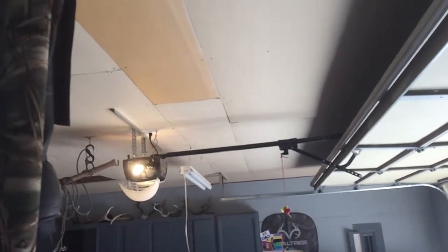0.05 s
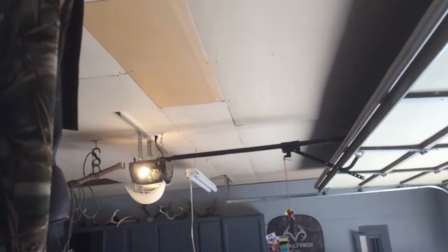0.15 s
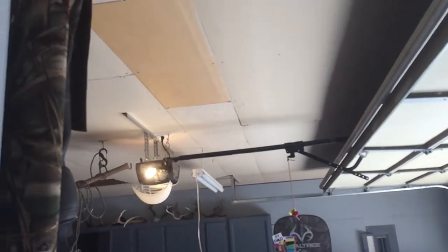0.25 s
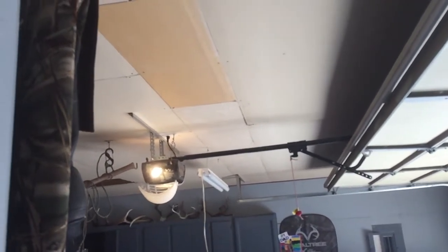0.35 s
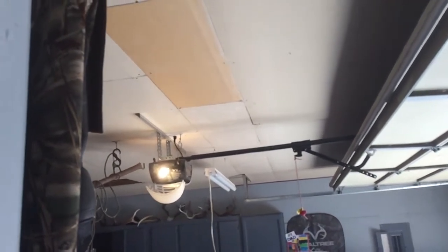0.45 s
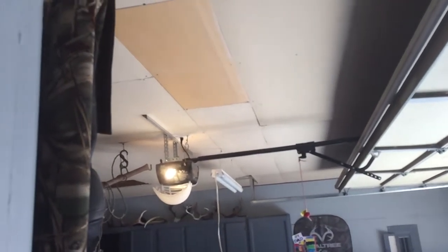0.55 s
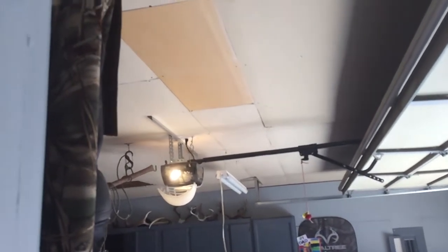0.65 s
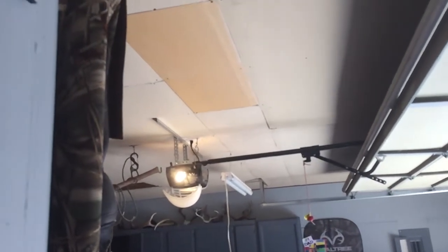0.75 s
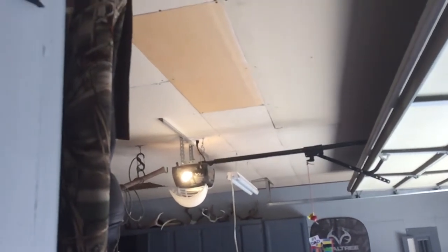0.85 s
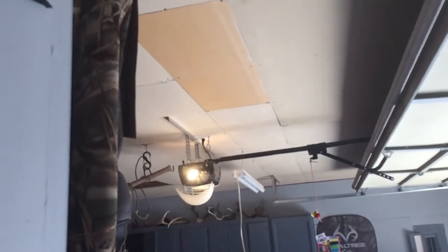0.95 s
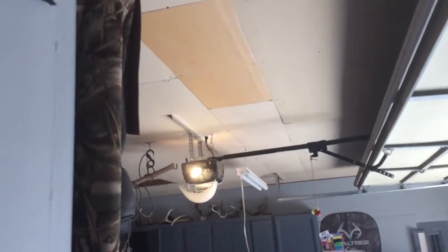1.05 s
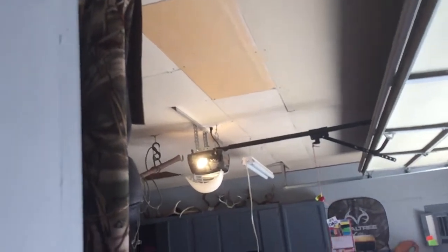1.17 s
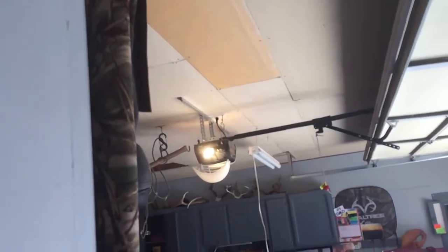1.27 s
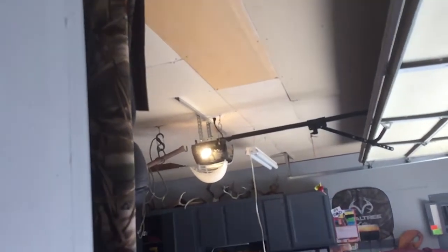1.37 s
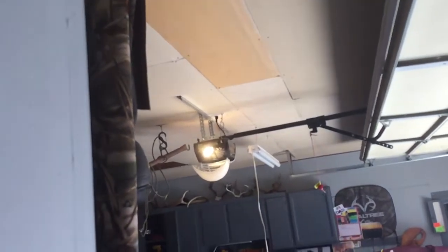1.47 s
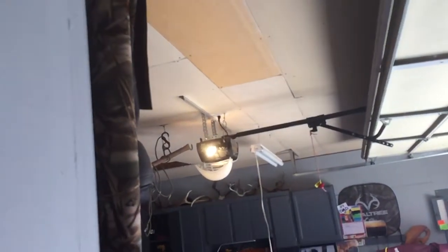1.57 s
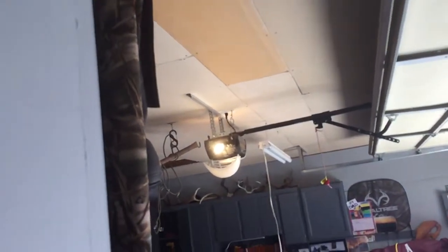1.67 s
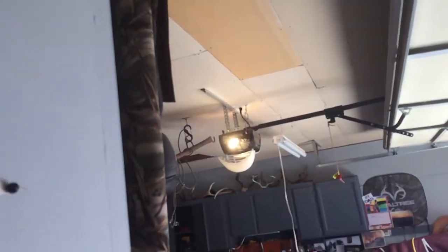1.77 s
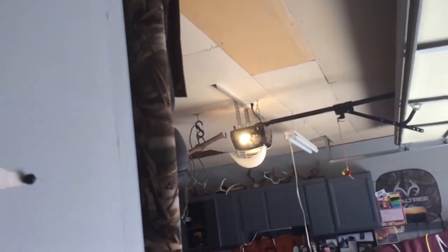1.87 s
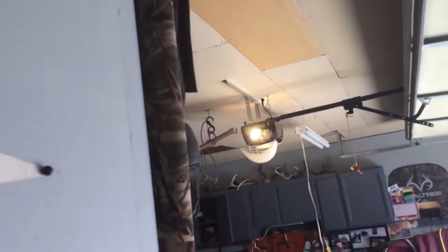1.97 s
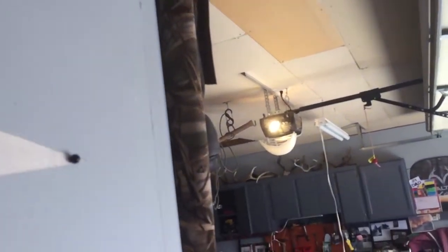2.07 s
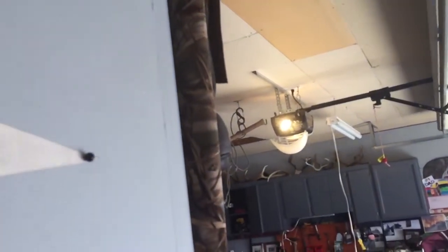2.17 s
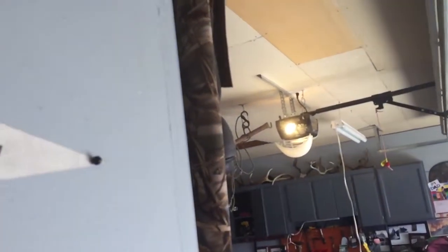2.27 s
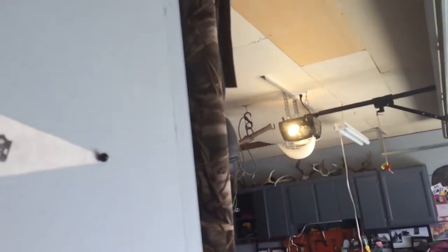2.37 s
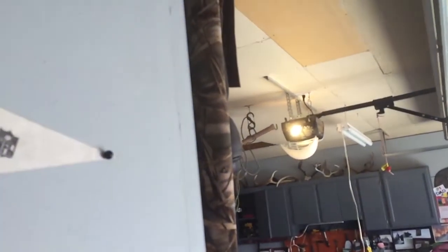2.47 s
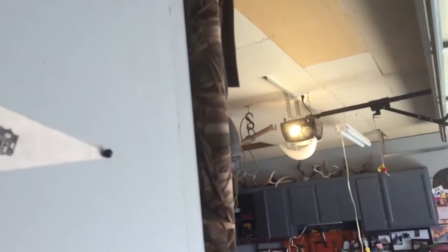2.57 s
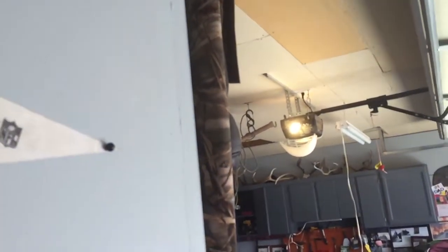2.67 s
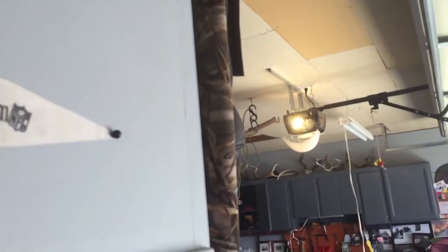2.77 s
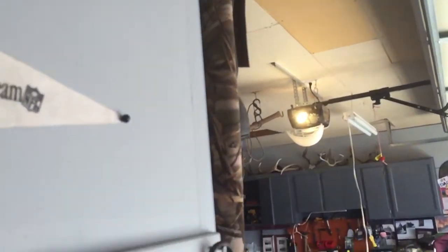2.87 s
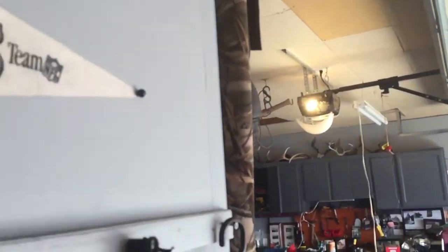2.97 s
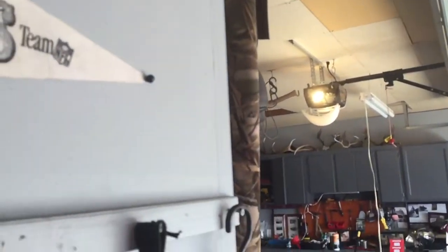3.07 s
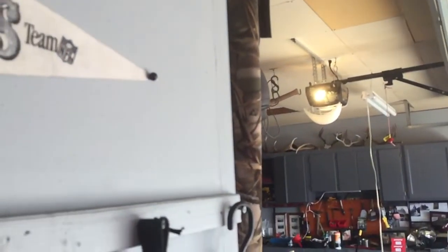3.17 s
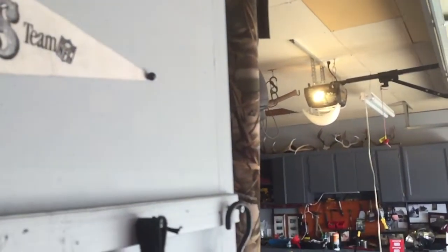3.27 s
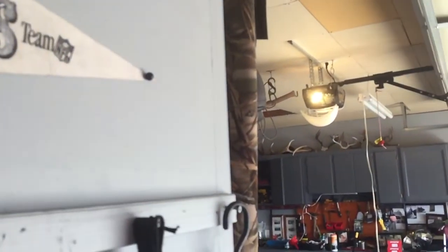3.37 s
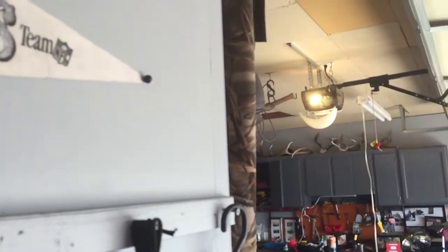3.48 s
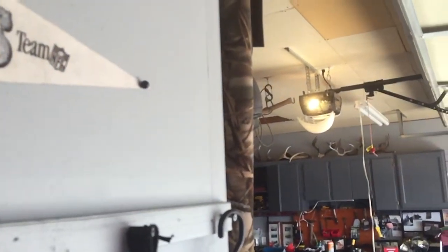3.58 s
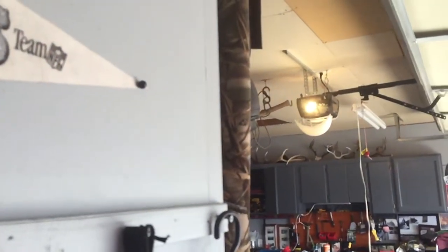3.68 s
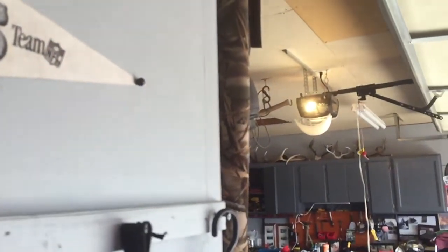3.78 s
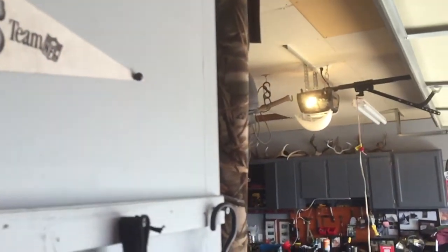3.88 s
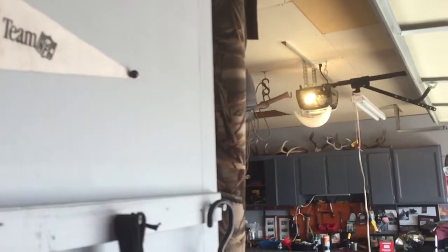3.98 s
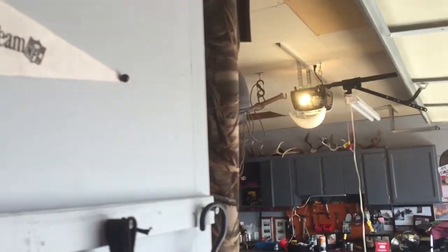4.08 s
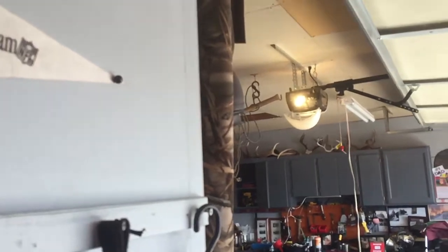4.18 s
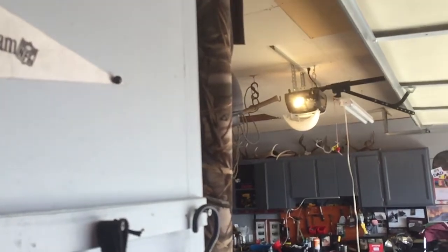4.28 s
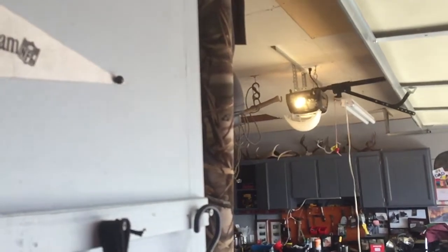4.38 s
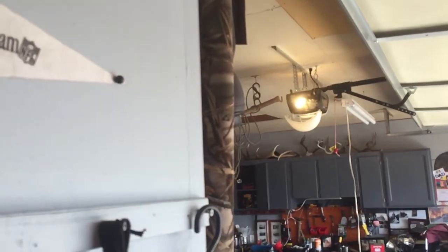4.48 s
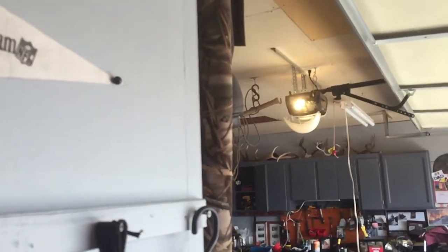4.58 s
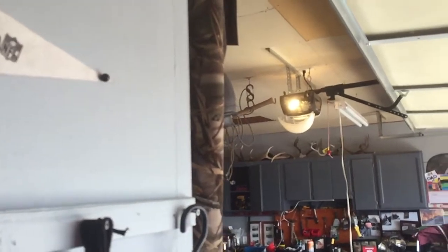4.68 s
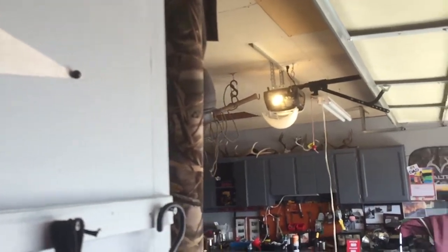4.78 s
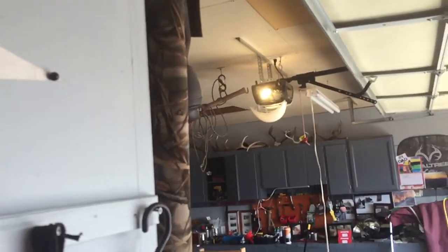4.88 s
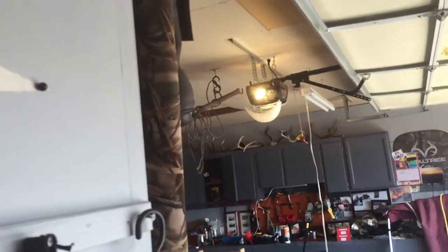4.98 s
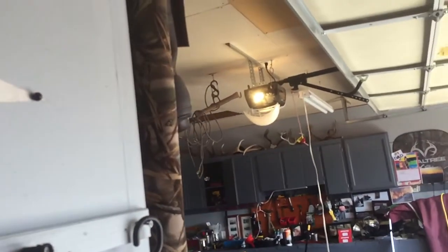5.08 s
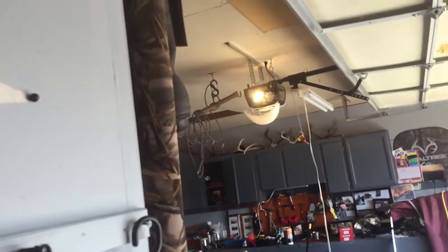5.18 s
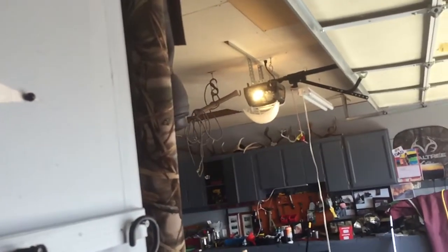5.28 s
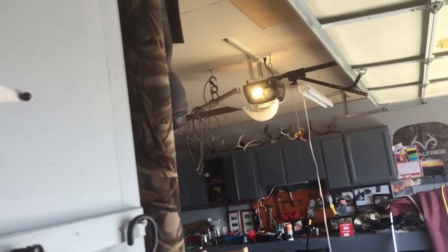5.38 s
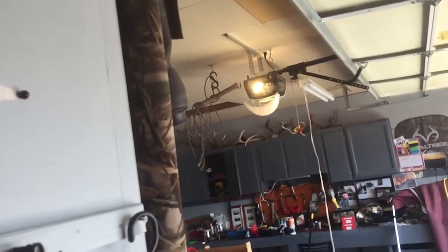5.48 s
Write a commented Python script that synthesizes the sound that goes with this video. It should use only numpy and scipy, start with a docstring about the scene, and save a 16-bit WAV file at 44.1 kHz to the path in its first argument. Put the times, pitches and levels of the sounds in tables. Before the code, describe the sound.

Inside a garage, a chain-drive opener lifts a sectional door. The motor gives a loud, steady low hum while the chain rattles along its rail and the rollers rumble in their tracks. Irregular metal clicks, panel clanks, dull thuds and a few tiny squeaks come through. After about four seconds the door clatters into its end position, the motor stops abruptly and the vibration fades to faint room tone.

```python
"""A chain-drive opener lifts a sectional garage door, its motor humming at twice the mains frequency.
Dense small impacts make the chain rattle along its rail and the rollers rumble in their tracks.
Blows excite the damped modes of knocking panels and a clicking trolley; rubbing steel squeaks.
The door clatters into its end position, the motor cuts out and the vibration dies away."""
import sys
import numpy as np
from scipy import signal
from scipy.fft import rfft, irfft, next_fast_len
from scipy.io import wavfile
from scipy.ndimage import map_coordinates

SR = 44100
rng = np.random.default_rng(int(sys.argv[2]) if len(sys.argv) > 2 else 0)


def generate_wav(sig):
    """Save sig (samples, or channels by samples) to the path in sys.argv[1] as 16-bit PCM at SR."""
    pcm = np.round(np.clip(np.atleast_2d(sig).T, -1, 1) * 32767).astype(np.int16)
    wavfile.write(sys.argv[1], SR, pcm)


N = 244314
TIME = np.arange(N) / SR
EVENT_TIME = np.arange(SR // 2) / SR
CUT_OUT_S = 4.373  # the motor switches off


def amp(db):
    """Amplitude grows tenfold every 20 dB."""
    return 10 ** (np.asarray(db) / 20)

def unit(x):
    """Normalisation to rms 1."""
    return x / np.sqrt(np.mean(x ** 2) + 1e-20)

def along(points, hz):
    """Interpolation of (frequency_hz, value) points on a logarithmic frequency axis."""
    frequencies, values = np.transpose(points)
    return np.interp(np.log(hz + 1), np.log(frequencies + 1), values)

def curves(rows):
    """Linear interpolation in time: one envelope for each column after the first."""
    times, *columns = np.transpose(rows)
    return [np.interp(TIME, times, column) for column in columns]

def wobble(rate_hz):
    """Random modulation: a spline through rate_hz Gaussian values a second."""
    return map_coordinates(rng.standard_normal(int(N * rate_hz / SR) + 4), [TIME * rate_hz])

def dying(start_s, db_per_s):
    """Exponential decay: full level until start_s, then a steady fall in decibels."""
    return amp(-db_per_s * np.maximum(TIME - start_s, 0))

def swell(centre_s, half_width_s):
    """A Gaussian envelope rises and falls around one moment."""
    return np.exp(-((TIME - centre_s) / half_width_s) ** 2)

def coloured(x, spectrum):
    """Filtering imposes a spectral shape; the result has rms 1."""
    size = next_fast_len(len(x) + 8192)
    gain = amp(along(spectrum, np.fft.rfftfreq(size, 1 / SR)))
    return unit(irfft(rfft(x, size) * gain, size)[:len(x)])

def noise(spectrum, size=N):
    """Filtered Gaussian noise of rms 1."""
    return coloured(rng.standard_normal(size), spectrum)

def resonance(hz, width_hz):
    """The spectrum of one resonance, width_hz wide at half power."""
    return [(max(hz - 3 * width_hz, hz / 4), -45), (hz - width_hz / 2, -3), (hz, 0),
            (hz + width_hz / 2, -3), (hz + 3 * width_hz, -45), (hz + 9 * width_hz, -100)]

def add(track, start_s, sound):
    """Superposition: a sound joins the track at start_s."""
    start = max(round(start_s * SR), 0)
    track[start:start + len(sound)] += sound[:max(N - start, 0)]

# reverberation time of the garage: frequency_hz, t60_s
ROOM_DECAY = [(150, 0.83), (1500, 0.49), (5000, 0.28), (14000, 0.064)]

def garage(x, wet_db):
    """Reverberation: wall reflections follow the direct sound, the treble dying first."""
    hz, t, bins = signal.stft(rng.standard_normal(SR // 2), SR, nperseg=256)
    decay = amp(-60 * t / along(ROOM_DECAY, hz)[:, None])
    tail = signal.istft(bins * decay, SR, nperseg=256)[1]
    tail = np.pad(tail / np.linalg.norm(tail), (SR // 300, 0))
    return x + amp(wet_db) * signal.fftconvolve(x, tail)[:len(x)]

def rattle(spectrum, rate_hz, spread_db, wash_db):
    """Shot noise: random contacts of uneven strength, over their diffuse wash in the room."""
    contacts = (rng.random(N) < rate_hz / SR) * rng.choice([-1, 1], N)
    strength = amp(spread_db * np.clip(rng.standard_normal(N), -2, 2))
    impacts = unit(garage(contacts * strength, wet_db=-2.5))
    return coloured(impacts + amp(wash_db) * rng.standard_normal(N), spectrum)

def patchy(x, depth_db, width_hz, length_s):
    """Time-varying filtering: resonances come and go as the parts travel."""
    hz, t, bins = signal.stft(x, SR, nperseg=1024)
    grid = np.meshgrid(hz / width_hz, t / length_s, indexing="ij")
    field = map_coordinates(rng.standard_normal((400, 400)), grid, mode="mirror")
    return unit(signal.istft(bins * amp(depth_db * field), SR, nperseg=1024)[1][:N])


# hum under the motor's changing load: time_s, level_db
HUM_LEVELS = [(0.05, -29), (0.44, -28), (0.77, -29), (1.21, -26.5), (2.27, -28), (2.31, -30), (2.76, -29.5),
              (3.06, -32), (3.11, -29.5), (3.99, -31.5), (4.0, -29.5), (4.34, -32.5)]
# overtones of the hum: harmonic_number, relative_db
HUM_OVERTONES = [(3, -33), (4, -47), (5, -46), (7, -47)]
# hollow resonance of the housing: frequency_hz, density_db
HOUSING_SPECTRUM = [(290, -48), (345, -2.5), (375, 8.5), (405, 2.5), (440, -16.5), (560, -51)]

def motor(hum_hz=119.88, run_down_t60_s=0.22):
    """Forced vibration: magnetic hum shakes the housing, which buzzes and drones more as the door rises."""
    hum_db, = curves(HUM_LEVELS)
    phase = 2 * np.pi * hum_hz * TIME + 0.14 * wobble(5.6)

    def overtone(order):
        """A harmonic, modulated at random in level and phase."""
        level = np.sqrt(2) * amp(1.5 * wobble(12))
        return level * np.sin(order * phase + wobble(14) + rng.uniform(0, 2 * np.pi))

    overtones = sum(amp(db) * overtone(order) for order, db in HUM_OVERTONES)
    hum = amp(hum_db) * (np.sqrt(2) * np.sin(phase) + overtones)
    rise_db = 3 * TIME
    buzz = amp(-65 + rise_db) * overtone(2)
    drone = amp(-69 + rise_db + 1.7 * wobble(7.5)) * noise(HOUSING_SPECTRUM)
    return dying(CUT_OUT_S, 60 / run_down_t60_s) * (hum + buzz + drone)

# drag on the moving door, each level relative within its column: time_s, roller_db, chain_db, link_db
DRAG_LEVELS = [(0.08, -55, -57, -71.5), (0.2, -58, -58.5, -71.5), (0.34, -52.5, -57.5, -73),
               (0.53, -61, -59.5, -74), (0.8, -56, -57.5, -76), (1.05, -61, -62.5, -77.5),
               (1.2, -53, -58, -70), (1.36, -53.5, -60, -70), (1.62, -48.5, -55.5, -63),
               (1.8, -49.5, -56.5, -71), (2.02, -50, -58, -71), (2.4, -55, -61, -75),
               (2.7, -61, -60.5, -74.5), (3.0, -55.5, -58.5, -71.5), (3.46, -55, -56.5, -72.5),
               (3.68, -59.5, -59.5, -74), (3.88, -55.5, -60, -72.5), (4.3, -51, -57, -67.5)]
# spectra of the moving parts: frequency_hz, density_db
ROLLER_SPECTRUM = [(250, -12.5), (400, -7.5), (450, -13), (540, -6), (660, 1), (850, 2), (1060, -2),
                   (1400, 0.5), (1800, -3), (2400, -6.5), (4000, -49.5)]
CHAIN_SPECTRUM = [(1200, -21), (2000, -7), (2450, 3), (2800, 3.5), (3150, 1.5), (3800, -1.5), (4400, -16.5),
                  (5000, -30.5), (8000, -39)]
LINK_SPECTRUM = [(3000, -24), (4300, 6.5), (4900, -3.5), (5500, 3), (6300, 1), (7800, -5), (9300, -6),
                 (10400, -16.5), (11300, -11), (13000, -12.5), (15700, -21.5)]
PANEL_SPECTRUM = [(22, -28), (38, -17), (55, -0.5), (85, 5.5), (130, 4), (205, -4), (245, -7), (300, -10.5),
                  (380, -17), (450, -15), (650, -60.5)]

def running_gear(mesh_hz=59.4, coast_s=0.069, sway_s=0.22):
    """Contact noise: rollers grind, panels rumble and the chain pulses as its links meet the sprocket."""
    roller_db, chain_db, link_db = curves(DRAG_LEVELS)
    mesh = np.sin(2 * np.pi * mesh_hz * TIME + 0.62 * wobble(5.1))
    shake = wobble(35)  # common to rollers, chain and links
    grind = rattle(ROLLER_SPECTRUM, rate_hz=1000, spread_db=5.5, wash_db=-3)
    grind = patchy(grind, depth_db=2.5, width_hz=90.8, length_s=0.14)
    clink = rattle(CHAIN_SPECTRUM, rate_hz=1000, spread_db=6.5, wash_db=-5.5)
    clink = patchy(clink, depth_db=2, width_hz=130, length_s=0.2007)
    sizzle = rattle(LINK_SPECTRUM, rate_hz=2700, spread_db=8, wash_db=-1)
    sizzle = patchy(sizzle, depth_db=3, width_hz=130, length_s=0.1)
    panels = amp(-47 + 2 * wobble(7)) * noise(PANEL_SPECTRUM)
    rollers = amp(roller_db + 0.45 + 1.3 * shake + 0.84 * wobble(170)) * grind
    chain = amp(chain_db - 1.13 + 0.5 * shake + 0.97 * mesh) * clink
    rail = rail_song()
    links = amp(link_db + 0.9 + 0.83 * shake + 2.5 * wobble(60) + 0.24 * mesh) * sizzle
    link_ticks = amp(link_db - 9) * rattle(LINK_SPECTRUM, rate_hz=60, spread_db=1.5, wash_db=-28)
    # the door coasts briefly after the cut-out; its heavy panels sway for longer
    coast = dying(CUT_OUT_S + coast_s, db_per_s=81)
    sway = dying(CUT_OUT_S + sway_s, db_per_s=75)
    return sway * panels + coast * (rollers + chain + rail + links + link_ticks)

# the quiet garage: frequency_hz, density_db
AMBIENT_SPECTRUM = [(20, -24), (50, -1.5), (85, -0.5), (180, -12.5), (330, -17), (1000, -21.5),
                    (3000, -27.5), (5000, -31.5), (9000, -35), (15700, -43)]

def room_tone():
    """Stationary noise: a faint, low background fills the garage."""
    return amp(-67) * noise(AMBIENT_SPECTRUM)

# sheet steel, hinges and loose hardware: frequency_hz, density_db
SHEET_SPECTRUM = [(250, 7.5), (480, -1.5), (600, -1.5), (860, 3), (1100, 0.5), (1400, 2.5), (1800, -8),
                  (2500, -23), (5000, -55)]
HINGE_SPECTRUM = [(1200, -18), (2100, 5), (3000, 1.5), (4000, 0.5), (5000, -11), (6300, -9), (8000, -21),
                  (11000, -42), (15700, -50.5)]
JINGLE_SPECTRUM = [(5000, -24.5), (8000, 1.5), (10500, 0), (13200, -1), (15700, -1.5)]
# panels knocking at their hinges: start_s, clank_db, hinge_db, jingle_db
PANEL_KNOCKS = [(0.044, -38.5, -49, -63.5), (0.596, -44.5, -51, -64), (0.634, -47.5, -52.5, -72),
                (0.657, -47, -60, -79), (1.116, -43.5, -52, -70.5), (1.612, -43.5, -52, -72.5),
                (2.822, -42.5, -52.5, -76), (3.077, -47, -54, -76), (3.237, -50.5, -51.5, -70.5),
                (3.506, -49.5, -54.5, -78.5), (4.074, -43, -47, -65.5), (4.209, -37.5, -49, -60),
                (4.248, -48, -56, -75), (4.317, -35.5, -47.5, -66.5), (4.391, -43, -52.5, -64),
                (4.45, -46.5, -60, -74.5), (4.551, -60, -69, -79)]

def knocks(t60_s=0.17):
    """Impact excitation: a jolted panel clanks, its hinges rattle and loose hardware jingles."""
    track, t = np.zeros(N), EVENT_TIME
    for start_s, clank_db, hinge_db, jingle_db in PANEL_KNOCKS:
        clank = amp(clank_db) * noise(SHEET_SPECTRUM, len(t))
        hinge = amp(hinge_db) * noise(HINGE_SPECTRUM, len(t))
        jingle = amp(jingle_db) * noise(JINGLE_SPECTRUM, len(t))
        attack = (1 - np.exp(-t / 0.00044)) * (1 + 0.49 * np.exp(-t / 0.0046))
        blow = attack * amp(-60 * t / t60_s)
        # loose parts keep rebounding after the first blow
        rebound_db = 2.2 * np.interp(t, np.arange(160) / 300, rng.standard_normal(160))
        chatter = amp(rebound_db * (1 - np.exp(-t / 0.008)))
        add(track, start_s, garage(blow * chatter * (clank + hinge + jingle), wet_db=-7))
    return track

# modal spectrum of a panel: pitch_ratio, density_db
FLEXURAL_MODES = [(.33, -50), (.56, -14.5), (1, 2.5), (1.3, -16.5), (1.7, -27), (2.3, -20), (2.8, -24.5),
                  (4, -50), (12, -110)]
# dull thuds of the swaying door: start_s, level_db, pitch_hz, t60_s
PANEL_THUDS = [(0.051, -35, 163, 0.41), (0.621, -31, 168, 0.53), (1.131, -36, 159, 0.27),
               (1.699, -40.5, 160, 0.32), (2.233, -53.5, 385, 0.2), (2.24, -34, 163, 0.36),
               (2.83, -38.5, 163, 0.88), (3.484, -35.5, 196, 0.21), (3.489, -42, 397, 0.22),
               (3.96, -30, 178, 0.22), (4.07, -37, 385, 0.21), (4.209, -25.5, 214, 0.29),
               (4.213, -34, 467, 0.16), (4.32, -41, 480, 0.23), (4.331, -35, 69.5, 0.65),
               (4.479, -39.5, 64, 0.47), (4.73, -48, 212, 0.23), (4.932, -48.5, 98, 0.18),
               (5.281, -55.5, 90, 0.37)]

def thuds():
    """Flexural vibration: the wide panels boom in a cluster of damped low modes."""
    track, t = np.zeros(N), EVENT_TIME
    for start_s, level_db, pitch_hz, t60_s in PANEL_THUDS:
        cluster = [(pitch_hz * ratio, db) for ratio, db in FLEXURAL_MODES]
        envelope = amp(level_db - 60 * t / t60_s) * (1 - np.exp(-t / 0.01))
        add(track, start_s, envelope * noise(cluster, len(t)))
    return track

# steel rubbing on steel: start_s, level_db, pitch_hz, length_s
STEEL_SQUEAKS = [(0.592, -62, 5600, .05), (1.471, -40.5, 2790, 0.034), (1.645, -46, 795, 0.032),
                 (2.819, -51, 920, 0.021), (3.073, -49, 1390, 0.014), (3.094, -49.5, 1010, 0.019),
                 (4.309, -42.5, 1680, 0.0098), (4.317, -38, 880, 0.019), (4.39, -50.5, 1620, 0.048),
                 (4.549, -57, 940, 0.022), (4.603, -52.5, 1770, 0.024), (4.667, -59.5, 950, 0.073)]

def squeaks(turn_s=0.093, relative_width=0.17):
    """Friction excites narrow resonances: steel parts squeak and a dry roller chirps once a turn."""
    track, t = np.zeros(N), EVENT_TIME
    roller_chirps = [(3.232 + turn * turn_s, -56, 3850, 0.033) for turn in range(4)]
    for start_s, level_db, pitch_hz, length_s in STEEL_SQUEAKS + roller_chirps:
        peak_s = length_s / 3
        envelope = amp(level_db) * t / peak_s * np.exp(1 - t / peak_s)
        add(track, start_s, envelope * noise(resonance(pitch_hz, pitch_hz * relative_width), len(t)))
    return track

# modes of the steel trolley and rail: frequency_hz, relative_db, t60_s
TROLLEY_MODES = [(1030, -4.5, 0.019), (1677, -5.5, 0.026), (2170, -10, 0.042), (2840, 4, 0.021),
                 (3200, -9.5, 0.037), (3850, -11.5, 0.04), (4220, -11, 0.026), (4660, -11.5, 0.025),
                 (6440, -17.5, 0.015)]
# steel striking steel: frequency_hz, density_db
SNAP_SPECTRUM = [(3000, -6), (4700, -2.5), (8000, -2), (10400, -13.5), (12500, -14.5), (15700, -23.5)]
# chain striking the trolley, each level relative within its column: start_s, body_db, ring_db, snap_db
TROLLEY_CLICKS = [(0.952, -45, -43.5, -60.5), (1.342, -54, -48.5, -64), (1.394, -61, -46.5, -69),
                  (1.4738, -61, -38, -43), (1.6116, -38, -24.5, -49), (2.153, -54, -46.5, -47.5),
                  (2.422, -63, -61, -63), (2.742, -40, -50, -59.5), (2.883, -39, -51.5, -54),
                  (2.996, -60, -52, -56.5), (3.050, -57, -67, -59), (3.178, -57, -52.5, -60.5),
                  (3.644, -50.5, -49, -66), (3.777, -55, -54.5, -65.5), (4.077, -53, -46, -53.5),
                  (4.607, -38, -51, -73), (4.761, -77, -62, -64.5)]

def clicks():
    """Free vibration: a link snaps against the trolley with a crack, and the steel rings in its modes."""
    track, t = np.zeros(N), EVENT_TIME
    strike = (1 - np.exp(-t / 0.0017)) * amp(-60 * t / 0.024)
    for start_s, body_db, ring_db, snap_db in TROLLEY_CLICKS:
        modes = np.zeros(len(t))
        for hz, db, t60_s in TROLLEY_MODES:
            decay = amp(db + rng.normal(0, 1) - 60 * t / t60_s)
            modes += decay * np.sin(2 * np.pi * hz * t + rng.uniform(0, 2 * np.pi))
        ring = amp(ring_db + 4) * modes * (1 - np.exp(-t / 0.0026))
        body = amp(body_db) * noise(SHEET_SPECTRUM, len(t))
        hinge = amp(ring_db) * noise(HINGE_SPECTRUM, len(t))
        snap = amp(snap_db + 6.5) * noise(SNAP_SPECTRUM, len(t))
        add(track, start_s, garage(ring + strike * (body + hinge + snap), wet_db=-16))
    return track

def rail_song():
    """Resonance: the rail sings in one narrow band as the trolley slides along it."""
    envelope = amp(-63 + 1.5 * wobble(8)) * swell(centre_s=2.55, half_width_s=0.45)
    return envelope * noise(resonance(2720, width_hz=390))

# shivering hardware: frequency_hz, density_db
HARDWARE_SPECTRUM = [(4000, -18), (6500, 1), (8000, 0), (10500, -3), (12300, 0), (13200, 3.5),
                     (14200, -5.5), (15700, -4.5)]

def clatter():
    """Repeated impacts: loose hardware and sheet steel shiver as the door reaches its end position."""
    hardware = amp(-65) * rattle(HARDWARE_SPECTRUM, rate_hz=960, spread_db=4, wash_db=-1)
    sheet = amp(-47.5) * rattle(SHEET_SPECTRUM, rate_hz=220, spread_db=6.5, wash_db=-1.5)
    return swell(centre_s=4.31, half_width_s=0.095) * (hardware + sheet)

def scene():
    """Superposition: opener, door and quiet garage sum in one channel."""
    mix = motor() + running_gear() + clicks() + knocks() + squeaks() + thuds() + clatter() + room_tone()
    return mix[None]

def record(dry):
    """Band limiting: an ideal low-pass filter removes the highest treble."""
    cutoff_hz = 15750
    size = next_fast_len(N + 8192)
    passband = np.fft.rfftfreq(size, 1 / SR) < cutoff_hz
    return irfft(rfft(dry, size) * passband, size)[..., :N]


dry = scene()
out = record(dry)
generate_wav(out)
```